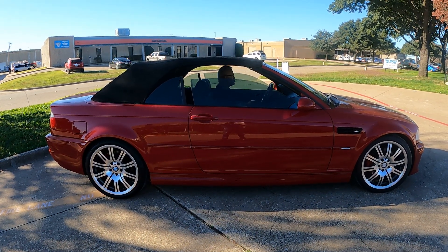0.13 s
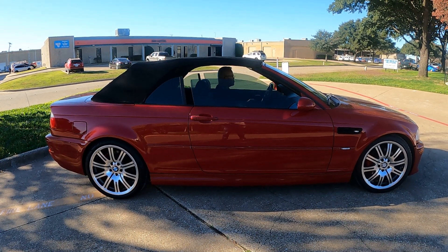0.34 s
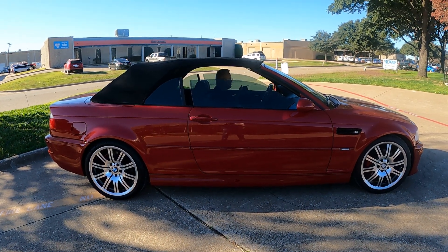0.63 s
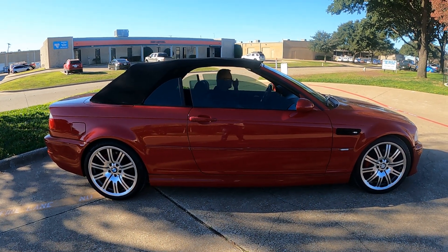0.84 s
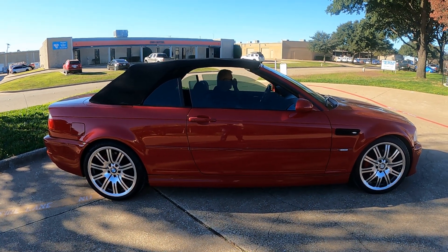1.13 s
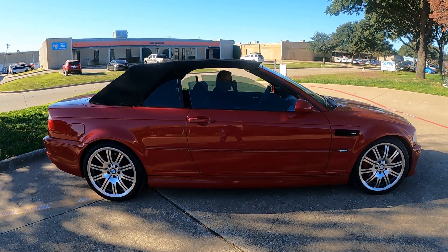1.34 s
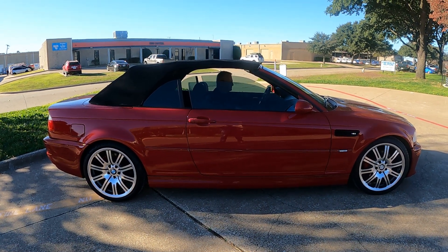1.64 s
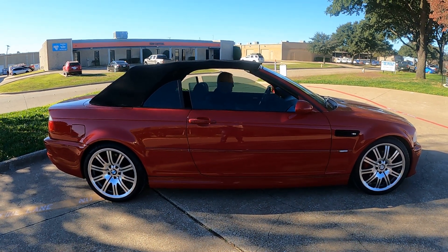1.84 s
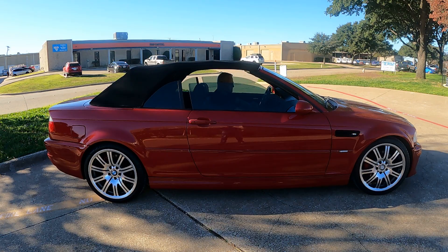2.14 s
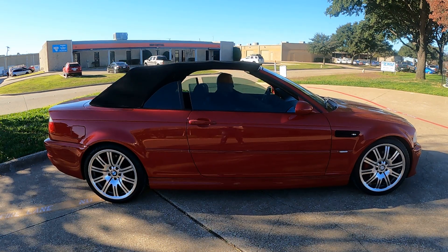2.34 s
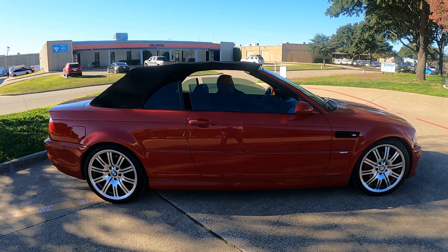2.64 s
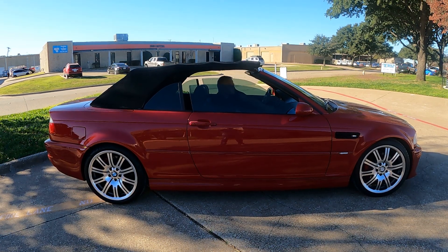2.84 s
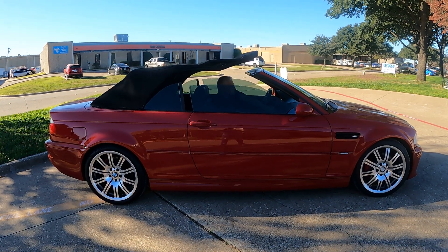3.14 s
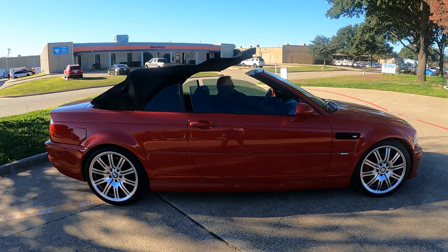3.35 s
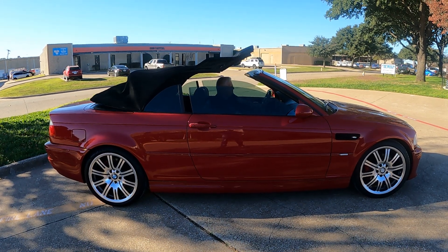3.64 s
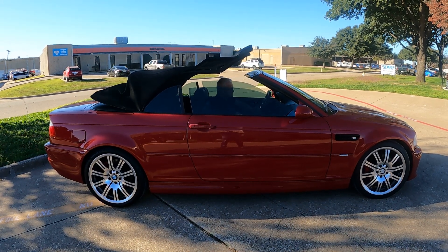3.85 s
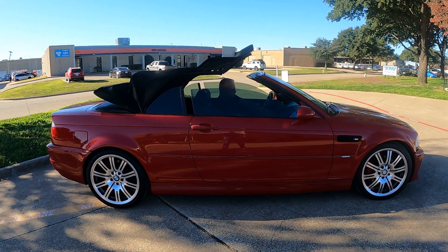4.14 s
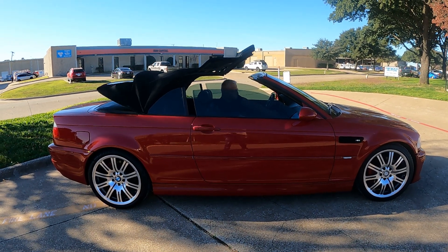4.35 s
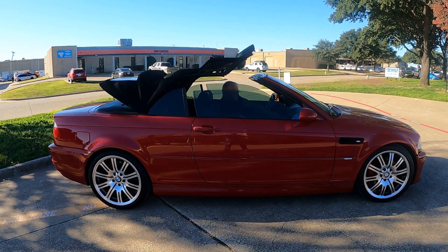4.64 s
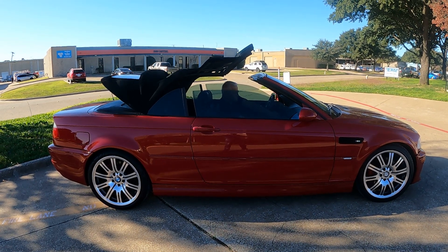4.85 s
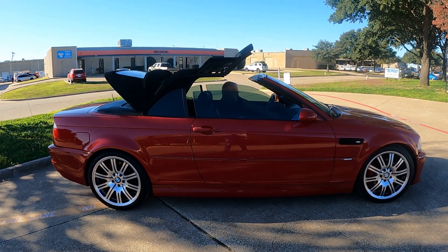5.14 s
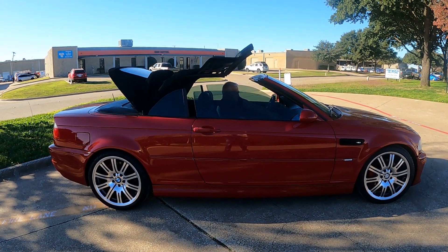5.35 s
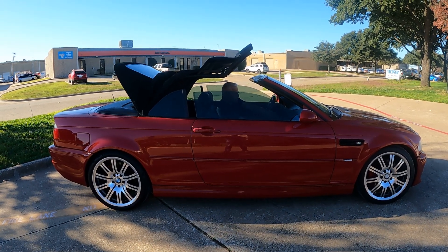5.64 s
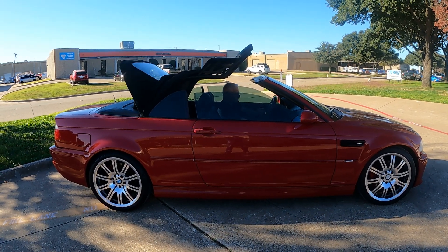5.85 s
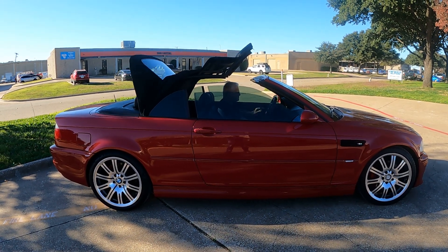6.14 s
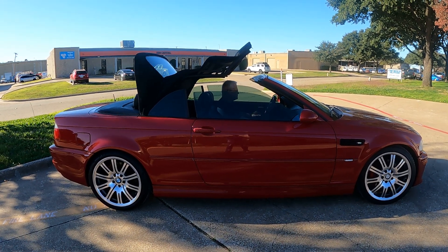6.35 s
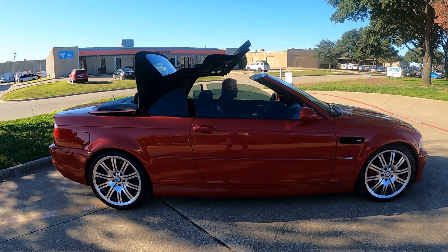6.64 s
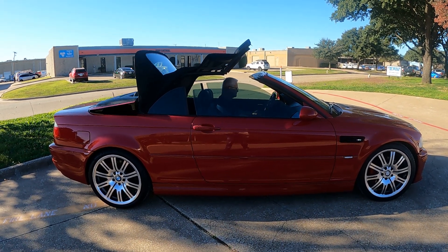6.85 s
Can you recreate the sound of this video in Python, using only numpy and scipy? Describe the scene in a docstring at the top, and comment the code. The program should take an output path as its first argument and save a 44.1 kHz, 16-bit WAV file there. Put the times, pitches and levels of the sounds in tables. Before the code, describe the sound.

A parked six-cylinder car idles in an open lot, with a throbbing exhaust, a rushing fan, a thin whine and fast light ticking. The convertible roof's motors join in with a soft hum, then a lower steady one as the roof folds. The sound grows gradually wider and brighter. Late on, a brief gust bumps the microphones, and a latch lets go with a few thuds and a metallic clack.

```python
"""A parked six-cylinder car idles in an open lot while its folding roof opens.
The exhaust throbs with each firing, the engine bay rumbles, roars and hisses, a chain whines and
fuel injectors tick. The roof's motors hum, and near the end a latch on its stowage lid lets go.
The sound starts narrow and dull, then grows wider and brighter; late gusts hit the microphones."""
import sys
import numpy as np
from scipy import signal
from scipy.fft import rfft, irfft, next_fast_len
from scipy.io import wavfile
from scipy.ndimage import uniform_filter1d, map_coordinates

SR = 44100
rng = np.random.default_rng(int(sys.argv[2]) if len(sys.argv) > 2 else 0)


def dump_mix(stems):
    """Bounce the given channels to the path in sys.argv[1] as a 16-bit WAV at rate SR."""
    frames = np.atleast_2d(stems).T  # one column per channel
    limited = np.clip(frames, -1, 1)  # hard clip at full scale
    pcm = np.round(limited * 32767).astype(np.int16)
    wavfile.write(sys.argv[1], SR, pcm)


N = 308700  # 7 seconds

# How fast the engine spins. Each row: time in seconds, turns a second.
ENGINE_SPEED = [(0.0, 15.509), (0.5, 15.011), (0.95, 14.525), (1.2, 14.5), (1.65, 14.52), (1.85, 14.302),
                (2.2, 14.413), (2.5, 14.375), (2.9, 14.125), (3.35, 13.852), (3.7, 13.982), (4.3, 14.053),
                (5.1, 14.091), (5.6, 14.238), (6.1, 14.35), (6.6, 14.295), (7.0, 14.206)]

def crankshaft():
    """Count the engine's turns so far; they set the timing of its tones and ticks."""
    return np.cumsum(curves(ENGINE_SPEED)[0]) / SR


# Tones that swell and fade. Each row: time in seconds, then levels in dB of the throb,
# the chain, the drone and the tone at three times the throb's pitch.
TONE_LEVELS = [(0, -23, -45, -42, -48), (.5, -24.5, -46, -42, -39), (.75, -28, -46, -41, -38),
               (1.05, -42, -43.5, -40, -38), (1.3, -37, -42.5, -38, -36), (1.6, -40, -43.5, -37.5, -36),
               (1.85, -37, -47.5, -38, -39), (2.05, -33, -46.5, -35, -41), (2.3, -40, -45.5, -32, -42),
               (2.6, -31, -45.5, -38, -42), (2.85, -31, -46, -39, -41), (3.05, -30.5, -57, -43, -38),
               (3.5, -28, -58, -40, -34.5), (3.75, -28, -49.5, -38, -34), (4, -26.5, -49.5, -38.5, -33.5),
               (4.7, -28.5, -51, -36.5, -37), (5.25, -28, -50, -39.5, -38.5), (5.55, -28, -47.5, -37, -38),
               (5.85, -29, -45.5, -36, -52), (6.2, -30, -44.5, -36.5, -45), (7, -28.5, -44.5, -36.5, -46)]
# Strong engine tones. Each row: cycles in two turns, early level in dB, late level in dB, dB lost for each turn
# a second above the engine's speed under load.
STRONG_OVERTONES = [(12, -32, -28.5, 3), (38, -44, -62, 0.5), (42, -58, -45, 14)]
# Faint exhaust tones. Each row: cycles in one turn, level in dB.
FAINT_TONES = [(1.5, -50), (4.5, -54), (13.5, -50.5), (15, -48), (22.5, -55), (24, -55), (27, -61.5)]

def exhaust(turns):
    """Tones line up into one suction pulse per firing, fuller as load drags the speed down."""
    firings_per_turn, drone_per_turn, first_pulse_turns = 3, 10.5, .222
    throb_db, _, drone_db, third_db = curves(TONE_LEVELS)
    extra_speed = curves(ENGINE_SPEED)[0] - 14  # under load: 14 turns a second

    def tone(per_turn, db):
        return -np.sqrt(2) * amp(db) * np.cos(2 * np.pi * per_turn * (turns - first_pulse_turns))

    out = tone(firings_per_turn, throb_db + .23 * wobble(6.7))
    out += tone(3 * firings_per_turn, third_db)
    for cycles, early_db, late_db, loss_db in STRONG_OVERTONES:
        out += tone(cycles / 2, glide(early_db, late_db) - loss_db * extra_speed + .49 * wobble(2.34))
    for per_turn, db in FAINT_TONES:
        out += tone(per_turn, db + 2.5 * wobble(2.825))
    return out + tone(drone_per_turn, drone_db + .6 * wobble(3.87))


def chain(turns):
    """Chain links meet the teeth of a wheel so fast that they make a slightly wavering whine."""
    teeth = 38
    level = amp(curves(TONE_LEVELS)[1] + .72 * wobble(13))
    return np.sqrt(2) * level * np.sin(2 * np.pi * teeth * turns + .1 * wobble(8))


# The tone colours of the engine bay's noises. Each row: pitch in Hz, relative strength in dB.
RUMBLE_COLOUR = [(8, -38), (14, -21), (25, -7.5), (33, 0), (43, -10), (57, 0), (70, -0.5), (85, -3),
                 (100, -4), (112, -3.5), (124, -8), (146, -8), (165, -9), (193, -12), (307, -15.5),
                 (387, -25), (480, -23.5), (620, -34), (1060, -120)]
FAN_EARLY = [(190, -25), (330, -6), (507, -19), (530, -7), (560, -0.5), (668, -2.5), (852, -5),
             (940, -12.5), (1380, -13), (1670, -19), (1820, -22), (2300, -26), (2860, -23.5), (3990, -21.5),
             (4600, -44), (5980, -63), (10100, -120)]
FAN_LATE = [(190, -45), (330, -2.5), (416, -31), (502, -3), (536, -5), (573, -4.5), (654, -3), (852, -8),
            (983, -8.5), (1240, -10), (1600, -10.5), (2250, -23.5), (2430, -22), (3420, -19.5),
            (4600, -35.5), (5980, -46), (10100, -120)]
EARLY_HISS = [(2350, -39), (4000, -7.5), (4340, -4.5), (5020, -5.5), (5820, -10.5), (8570, -10.5),
              (9250, -16.5), (11000, -30), (12300, -25), (13700, -28), (14800, -36), (15700, -48)]
LATE_HISS = [(2350, -20.5), (4000, 2), (4340, -6), (4810, -2), (5450, -5), (5800, -8.5), (6150, -1.5),
             (6450, -5.5), (7570, -8.5), (8100, -15), (8500, -13), (9540, -13), (10800, -18), (11600, -18),
             (12500, -20), (13200, -30), (14700, -32), (15700, -45)]
# Where metal parts ring. Each row: pitch in Hz, width in Hz, early and late boost (or cut) in dB.
PANEL_RINGS = [(987, 49, 4.5, 6.5), (1058, 20, 7, 4.5), (1395, 23, 3, 4.5), (1593, 19, 3.5, 6.5),
               (1740, 25, 7, 7), (2250, 73, 7.5, -19), (2420, 91, 8, 4.5), (2530, 23, 4, 6),
               (2750, 9.2, 2, -2), (3124, 91, 5.5, 4.5), (3350, 25, 10, 3.5), (3507, 47, 7, 9.5),
               (3800, 41, 6.5, -15), (4120, 28, 6, 3)]

def engine_bay(turns):
    """Rumble, hiss and a fan's roar that rings the panels and swells a little with each firing."""
    def with_panels(points, late):
        return lambda hz: along(points, hz) + sum(
            db[late] / (1 + (2 * (hz - pitch) / width) ** 2) for pitch, width, *db in PANEL_RINGS)

    swell = amp(.44 * np.cos(2 * np.pi * 3 * (turns - .04)) + .75 * wobble(6))
    rumble = amp(glide(-29, -30) + .74 * wobble(1.49)) * noise(colour(RUMBLE_COLOUR))
    roar = amp(-38) * shifting_noise(with_panels(FAN_EARLY, False), with_panels(FAN_LATE, True), swell)
    hiss_level = amp(glide(-56.5, -47.5, lag=2.87) + .64 * wobble(6.9))
    hiss = hiss_level * shifting_noise(colour(EARLY_HISS), colour(LATE_HISS), pace=TREBLE_PACE)
    return rumble + roar + hiss


# The roof's hums. Each row: start and end in seconds, pitch in Hz, rise in Hz a second, level in dB.
ROOF_HUMS = [(1.2, 3.1, 241.5, -1, -47), (2.75, 7.2, 104.5, 0.2, -41.5), (3.75, 5.05, 466, 3, -53)]

def roof_motors():
    """The roof's motors and hydraulic pump each hum at their own speed while they work."""
    t, out, fade_s = np.arange(N) / SR, np.zeros(N), .22
    for start, end, hz, rise, db in ROOF_HUMS:
        fade = np.clip(.5 + np.minimum(t - start, end - t) / fade_s, 0, 1)
        cycles = np.cumsum(hz + rise * (t - start)) / SR
        out += np.sqrt(2) * fade * amp(db + 2.1 * wobble(3.96)) * np.sin(2 * np.pi * cycles)
    return out


# The latch's knocks. Each row: start in seconds, ring level in dB, thud level in dB.
LATCH_KNOCKS = [(6.639, -64, -26), (6.677, -56, -25.5), (6.771, -34, -44), (6.7755, -39, -40),
                (6.876, -64, -27)]
# The notes of the steel catch and of the lid.
# Each row: pitch in Hz, relative level in dB, seconds to fade by 60 dB.
CATCH_NOTES = [(1590, 0, .11), (1815, -3, .09), (1945, -6, .07), (2190, -7, .06), (2350, -9, .05),
               (2635, -1, .05), (2725, -5, .05), (3990, -6, .04), (5100, -8, .045), (5300, -7, .045),
               (5820, -7, .05), (5975, -8, .05), (6300, -9, .05)]
LID_NOTES = [(520, -5, .08), (580, -4, .09), (680, -8, .07), (830, -11, .07), (980, -12, .07),
             (1325, -10, .09)]

def latch():
    """Each knock rattles the steel catch and thuds in the lid's panel."""
    out, t = np.zeros(N + SR), np.arange(SR // 5) / SR
    crack_band = signal.butter(3, [1400, 8000], "bandpass", fs=SR)
    attack = 1 - np.exp(-t / .002)

    def ring(notes):
        return sum(amp(db + rng.normal(0, 1.5) - 60 * t / fade_s)
                   * np.sin(2 * np.pi * (hz * t + rng.random())) for hz, db, fade_s in notes)

    for start, ring_db, thud_db in LATCH_KNOCKS:
        rattle = 1 + .6 * unit(uniform_filter1d(rng.standard_normal(len(t)), size=30))
        crack = .8 * amp(-60 * t / .08) * unit(signal.lfilter(*crack_band, rng.standard_normal(len(t))))
        catch = amp(ring_db) * (ring(CATCH_NOTES) * rattle + crack)
        thud = amp(thud_db) * ring(LID_NOTES)
        out[round(start * SR):][:len(t)] += attack * (catch + thud)
    return signal.lfilter(*signal.butter(2, 11000, fs=SR), out[:N])


# Injector and valve ticks. Each row: place in the cycle in turns, early and late relative level in dB.
TICK_PATTERN = [(.3, -6, -3), (.4, -1, -4), (.59, 7.5, 11.5), (.92, -3, -2), (1.3, -3, 1), (1.4, -6, -3),
                (1.545, -2, 1), (1.6, 3.5, 9), (1.645, 5, 3), (1.94, -4, -3)]
# The tone colours of the ticks. Each row: pitch in Hz, relative strength in dB.
EARLY_TICK = [(2200, -120), (3100, -12), (3550, 5), (4000, -16), (6000, -14), (7500, -6), (8500, 2),
              (9000, -1), (10000, -13), (11000, -26), (12500, -12), (13000, -15), (13500, -28),
              (15000, -34), (15800, -120)]
LATE_TICK = [(2200, -120), (3100, -1), (3600, 9.5), (4100, -8), (4900, -16), (5600, 2.5), (6200, -5),
             (8000, -8.5), (8770, -2), (9050, -5), (9300, 1), (9550, -6), (10100, -3.5), (10700, -15),
             (11200, -9.5), (11900, -5.5), (12800, -13), (13300, -24), (14000, -20), (15000, -28),
             (15800, -120)]

def injectors(turns):
    """Each injector or valve snaps once in two turns, making a tiny burst of noise."""
    place, early_db, late_db = np.transpose(TICK_PATTERN)
    tick_turns = (np.arange(0, turns[-1], 2)[:, None] + place).ravel()
    starts = np.searchsorted(turns, tick_turns + .004 * rng.standard_normal(tick_turns.size))
    share = glide(0, 1, lag=1.5)[np.minimum(starts, N - 1)].reshape(-1, len(place))
    tick_db = (early_db + (late_db - early_db) * share).ravel()
    sizes = amp(tick_db + .7 * rng.standard_normal(starts.size))
    t = np.arange(SR // 10) / SR
    attack = (1 - np.exp(-t / .0028)) ** 2
    decay = amp(-60 * t / .05) + .2 * amp(-60 * t / .2)
    bursts = signal.fftconvolve(np.bincount(starts, sizes, N + 1), attack * decay)[:N]
    ticks = shifting_noise(colour(EARLY_TICK), colour(LATE_TICK), bursts, TREBLE_PACE)
    return amp(glide(-64.5, -56.3, lag=.8)) * ticks


# The tone colour of the wind. Each row: pitch in Hz, relative strength in dB.
WIND_COLOUR = [(8, -20), (20, 8), (60, 7), (110, -31), (250, -15), (400, -90)]

def wind():
    """A low, lumpy breeze with one strong gust pushes on the microphones."""
    breeze_start_s, breeze_db, gust_peak_s, gust_boost_db = 5.33, -57.5, 6.1, 23
    t = np.arange(N) / SR
    swell_db = gust_boost_db * np.exp(-np.abs(t - gust_peak_s) / .1)
    lumps = np.clip((t - breeze_start_s) / .05, 0, 1) * amp(breeze_db + swell_db + 3.3 * wobble(14))
    return lumps * unit(filtered(rng.standard_normal(N), lambda hz: amp(along(WIND_COLOUR, hz))))


# Noise that differs between left and right. Each row: pitch in Hz, dB compared with the shared noise.
SIDE_NOISE = [(150, -80), (260, -48), (430, -12), (620, -31), (870, -18), (1700, -19), (2200, 0.5),
              (3100, -18), (4300, -2.5), (6000, -10.5), (7800, 1), (10000, -10.5), (12000, -2.5),
              (13800, 1), (15000, -18)]

def noise(colour_db, loudness=1):
    """Two rows of noise: the middle (what both sides share) and the side (how they differ)."""
    pair = loudness * rng.standard_normal((2, N))
    pair = filtered(pair, lambda hz: amp(colour_db(hz) + along(SIDE_NOISE, hz) * [[0], [1]]))
    return pair / np.std(pair[0])


# How the sound opens out. Each row: time in seconds, share of the late sound (0 to 1), width in dB.
OPENING_OUT = [(0, 0.11, -39), (1.5, 0.064, -28), (2, 0.22, -12), (3.2, 0.44, -1), (5, 0.75, 1.5),
               (7, 0.9, 3)]
TREBLE_PACE = 2.15  # hiss and ticks take on their late colour this many times faster

def shifting_noise(early, late, loudness=1, pace=1):
    """Noise that fades from an early colour towards a late one; pace hurries the change."""
    share = np.clip(pace * curves(OPENING_OUT)[0], 0, 1)
    return np.sqrt(1 - share) * noise(early, loudness) + np.sqrt(share) * noise(late, loudness)


def glide(early, late, lag=1):
    """Move a value from early towards late as the sound opens out; more lag holds it back."""
    return early + (late - early) * curves(OPENING_OUT)[0] ** lag


def amp(db):
    """Turn decibels into a number to multiply by."""
    return 10 ** (np.asarray(db) / 20)


def unit(x):
    """Scale a sound to an average power of 1."""
    return x / np.sqrt(np.mean(x ** 2) + 1e-20)


def along(points, hz):
    """Read between (Hz, value) points, spacing octaves evenly."""
    pitches, values = np.transpose(points)
    return np.interp(np.log(hz + 1), np.log(pitches + 1), values)


def colour(points):
    """Turn (Hz, dB) points into a function of pitch."""
    return lambda hz: along(points, hz)


def curves(rows):
    """Give one value per sample for each column after the time."""
    times, *columns = np.transpose(rows)
    return [np.interp(np.arange(N) / SR, times, column) for column in columns]


def wobble(rate):
    """A smooth curve through rate random values a second."""
    return map_coordinates(rng.standard_normal(int(N * rate / SR) + 4), [np.arange(N) * rate / SR])


def filtered(x, response):
    """Multiply each pitch in a sound by response(Hz)."""
    size = next_fast_len(N + 8192)
    return irfft(rfft(x, size) * response(np.fft.rfftfreq(size, 1 / SR)), size)[..., :N]


# How much of the middle spills into the side.
# Each row: pitch in Hz, share in step, share a quarter of a cycle out of step.
SIDE_SPILL = [(250, 0, 0), (500, -0.048, 0.083), (750, 0.079, 0.032), (1100, 0.01, -0.056),
              (1700, .03, -0.37), (2050, -0.31, -1), (2300, -0.14, 0.36), (3000, -0.0099, 0.15),
              (3800, 0.17, -0.081), (4300, -.1, -.75), (4900, -0.3, -.1), (5600, -.2, .15), (6600, 0.26, 0),
              (7200, 0, -0.13), (8300, 0.061, 0.32), (10300, 0, -.1), (11700, .45, .25), (13000, 0, 0.075)]

def stereo_side(middle, side_noise):
    """Make the left-right difference: it grows, but the highest treble is wide all along."""
    pitch, in_step, out_of_step = np.transpose(SIDE_SPILL)
    side = side_noise + filtered(middle, lambda hz: np.interp(hz, pitch, in_step + 1j * out_of_step))
    treble = filtered(side, lambda hz: hz > 10800)
    return treble + amp(curves(OPENING_OUT)[1]) * (side - treble)


def scene():
    """Mix the car and the wind into left and right."""
    turns = crankshaft()
    middle, side_noise = engine_bay(turns) + injectors(turns)
    middle = middle + exhaust(turns) + chain(turns) + roof_motors() + latch()
    side = stereo_side(middle, side_noise) + wind()
    return np.array([middle + side, middle - side])


def record(dry):
    """Cut away the very highest treble."""
    return filtered(dry, lambda hz: hz < 15750)


dry = scene()
out = record(dry)
dump_mix(out)
```